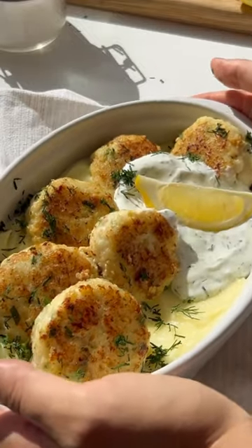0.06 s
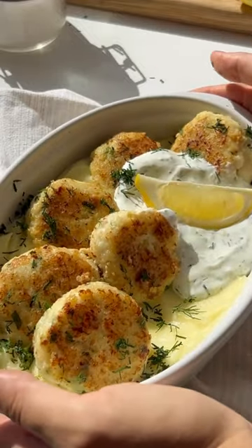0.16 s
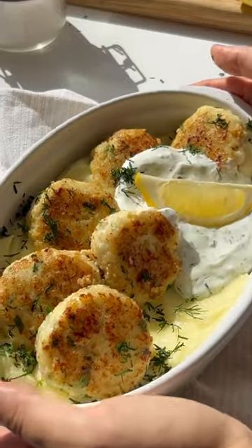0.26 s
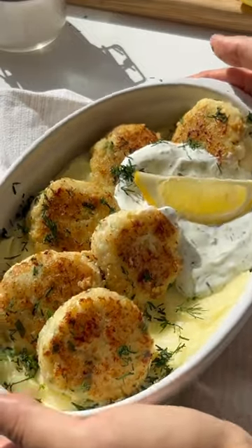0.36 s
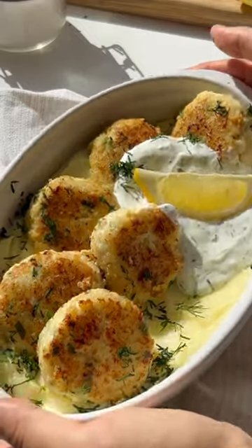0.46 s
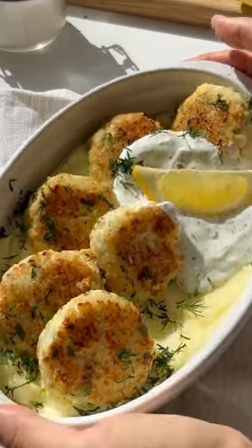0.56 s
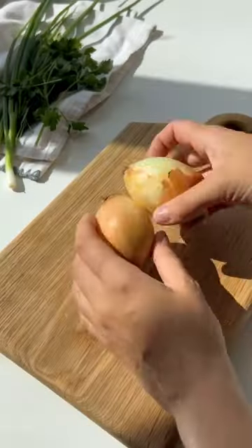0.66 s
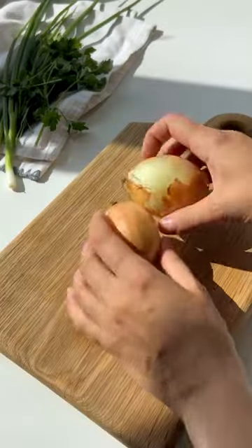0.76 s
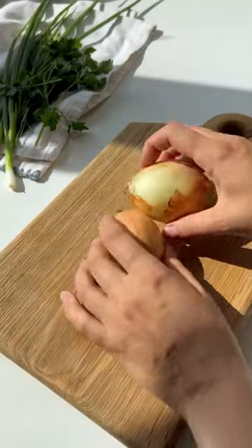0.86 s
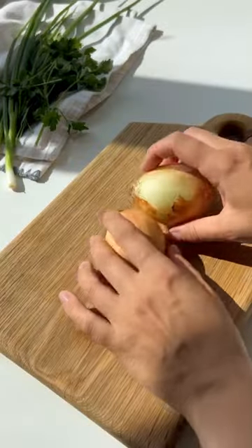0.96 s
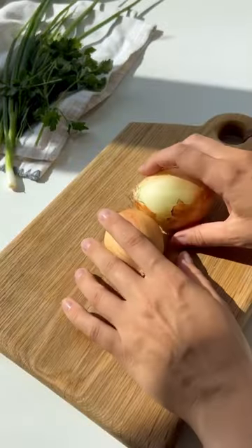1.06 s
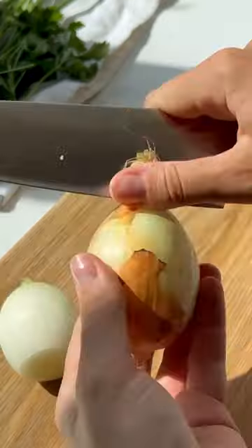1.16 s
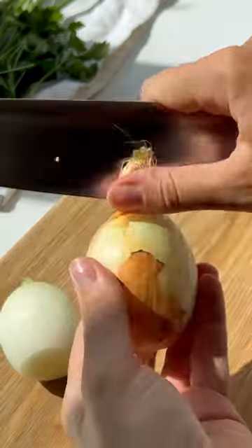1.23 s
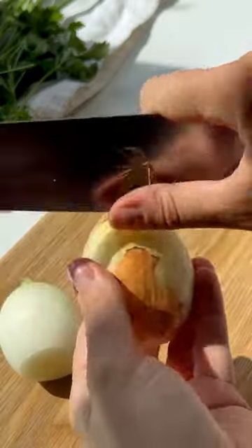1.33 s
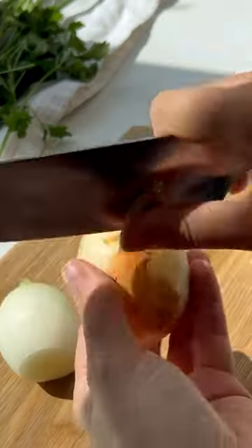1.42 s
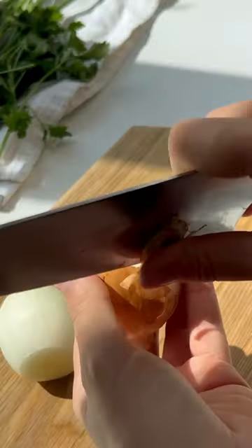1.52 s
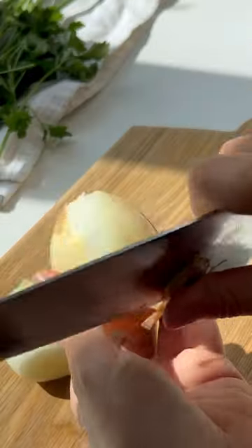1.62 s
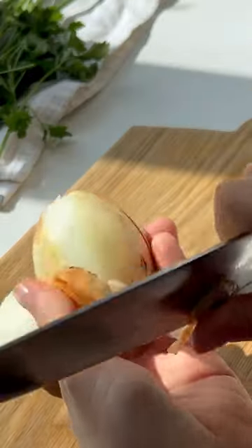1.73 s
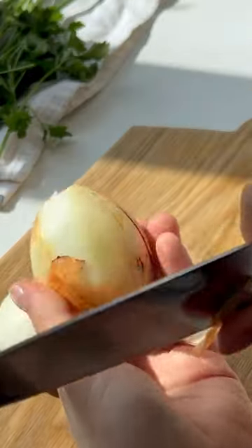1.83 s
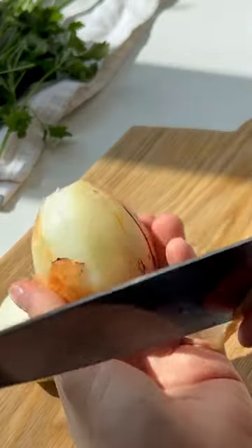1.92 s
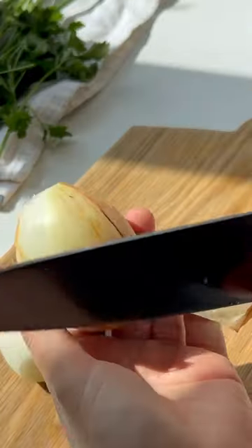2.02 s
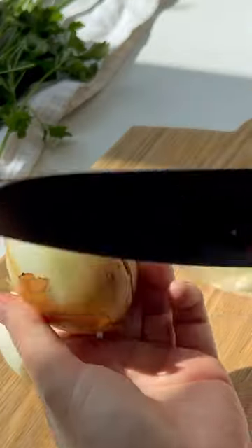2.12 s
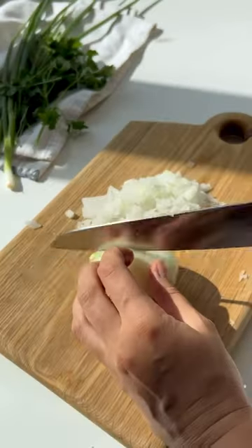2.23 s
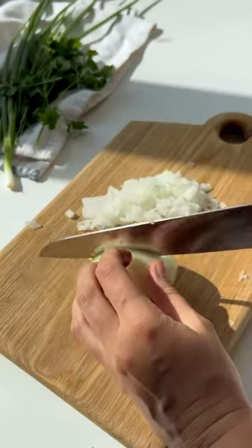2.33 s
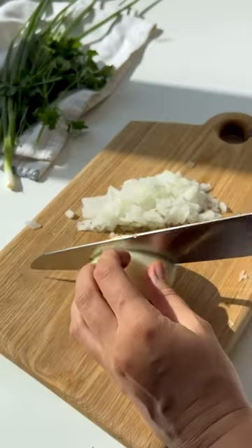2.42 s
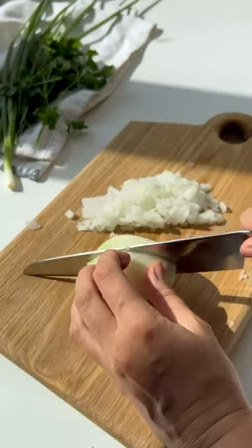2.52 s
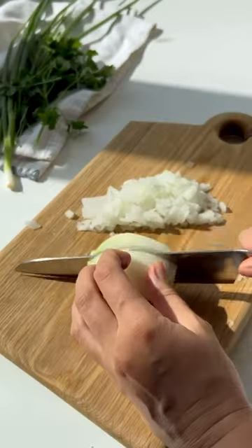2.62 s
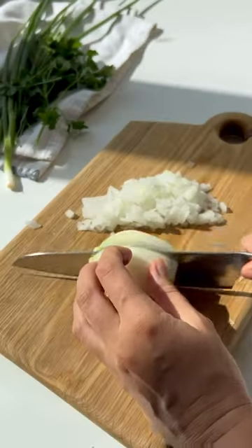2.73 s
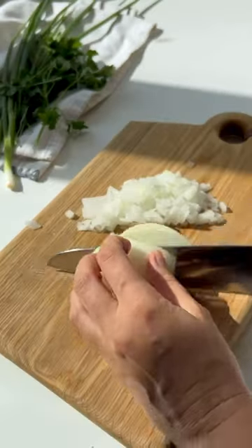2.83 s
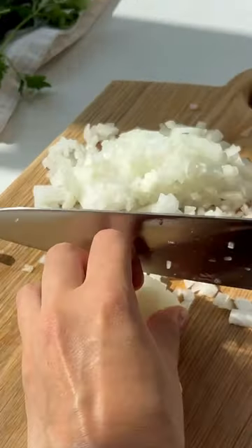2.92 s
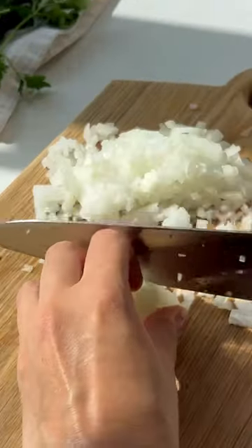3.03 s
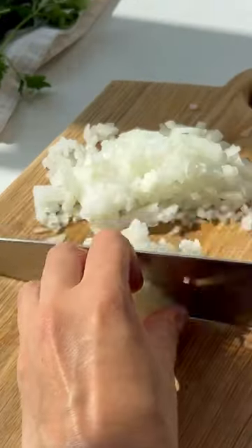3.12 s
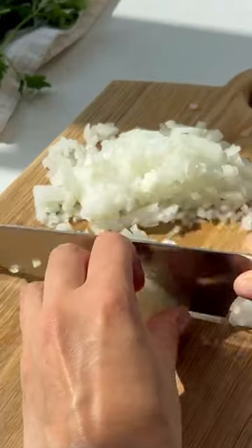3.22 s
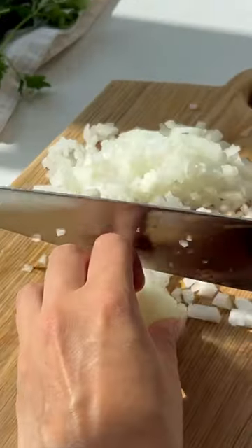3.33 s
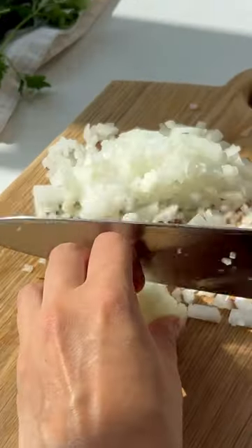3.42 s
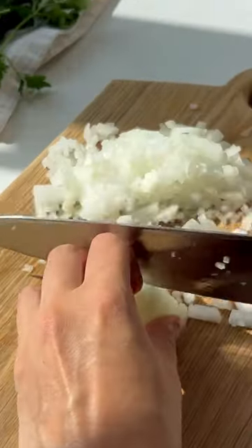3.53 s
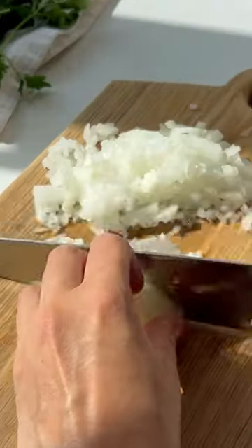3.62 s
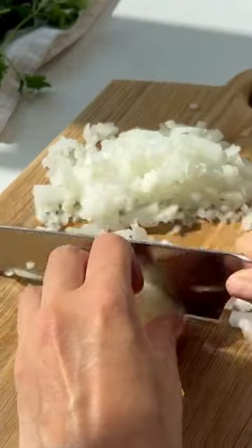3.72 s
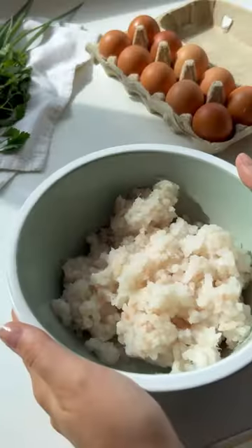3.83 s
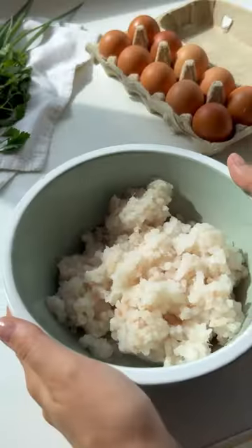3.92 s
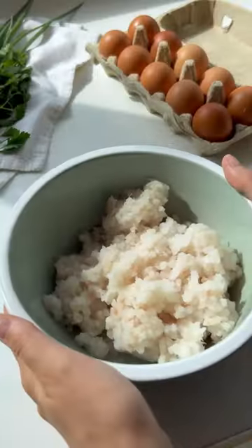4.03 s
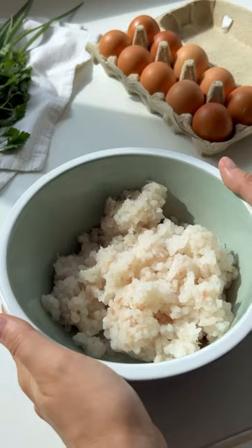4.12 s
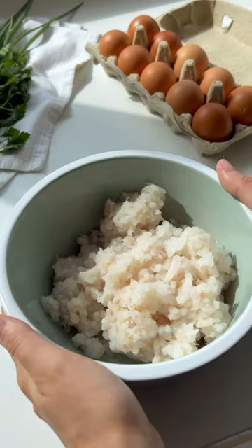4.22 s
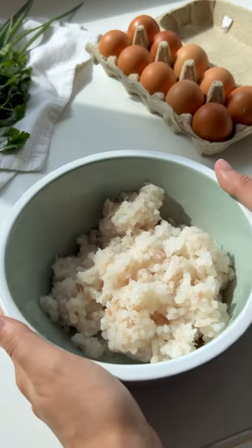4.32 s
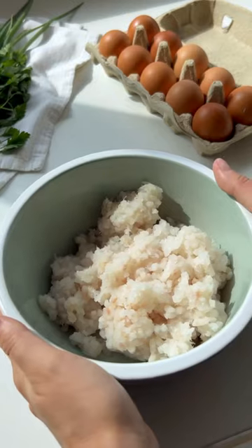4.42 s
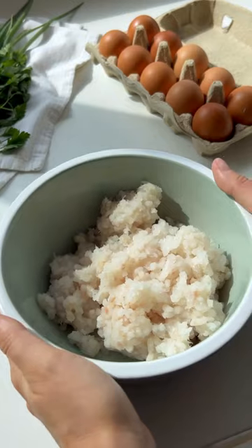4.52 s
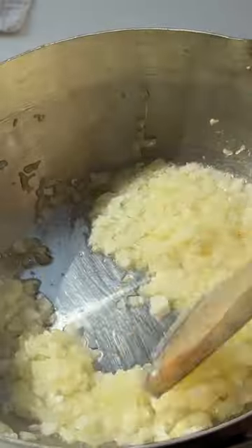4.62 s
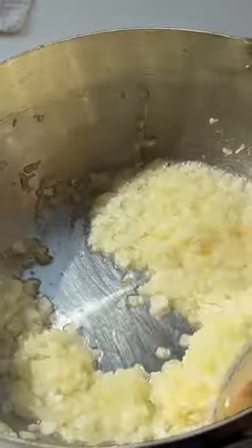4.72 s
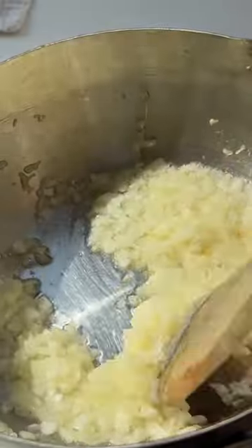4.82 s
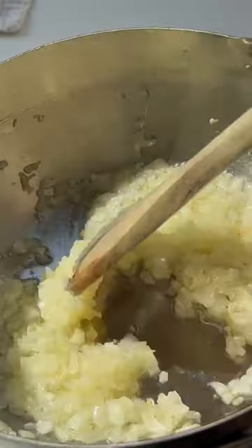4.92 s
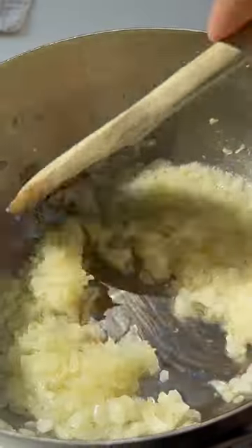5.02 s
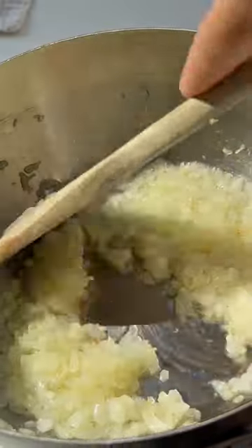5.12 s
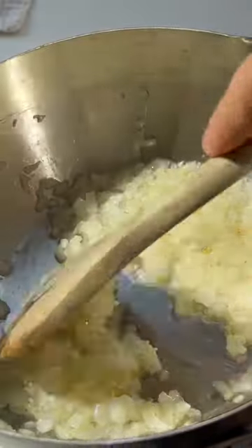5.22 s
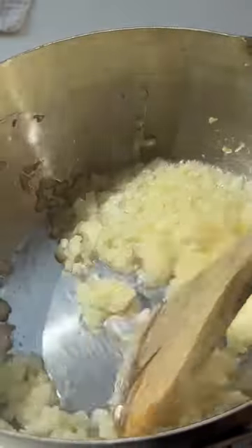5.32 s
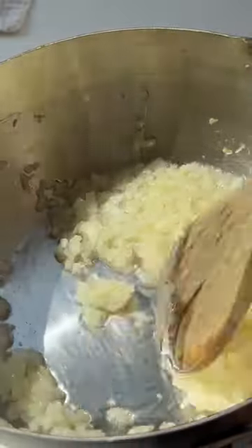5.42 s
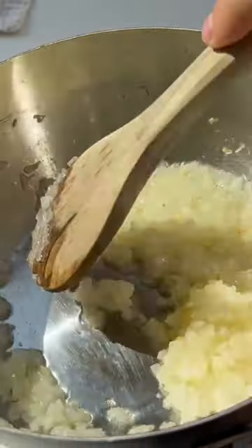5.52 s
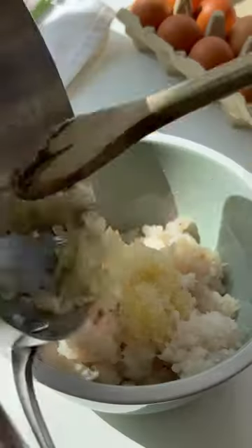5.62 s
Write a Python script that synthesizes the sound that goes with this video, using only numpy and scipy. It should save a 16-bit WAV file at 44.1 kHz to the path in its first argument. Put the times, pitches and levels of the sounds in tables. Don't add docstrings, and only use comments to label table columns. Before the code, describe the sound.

Phone view from above a kitchen worktop, small echoing room, hum and hiss changing at every hard cut. Quiet onion handling leads to bright peeling crackles, wetter slicing crunches with a knife knock, and two hard chops preceded by crisp pressing. Then one hollow bowl thud, a bright metallic pan knock, dry spoon taps, gentle sizzle and a final dull bump.

```python
import sys
import numpy as np
from scipy import signal
from scipy.fft import rfft, irfft, next_fast_len
from scipy.io import wavfile
from scipy.ndimage import uniform_filter1d

SR = 44100
rng = np.random.default_rng(int(sys.argv[2]) if len(sys.argv) > 2 else 0)


def wav_out(sig):
    wavfile.write(sys.argv[1], SR, np.round(np.clip(np.atleast_2d(sig).T, -1, 1) * 32767).astype(np.int16))


def volts(x):
    e = np.asarray(x, float) / 20
    return 10 ** e


N = 249606

# (time [s], blade level [dB], blade contact [ms], board level [dB], clatter level [dB])
CHOPS = [
    (2.964, -53, 0.19, -51.5, -50.5),
    (3.1175, -12, 0.28, -25.5, -6.5),
    (3.446, -65, 0.59, -47.5, -71.5),
    (3.629, -10.5, 0.42, -25.5, -9),
]
# (frequency [Hz], level [dB], t60 [s])
BLADE = [(674, -6, 0.11), (736, -12, 0.067), (920, -3.5, 0.045), (1013, -4.5, 0.036), (1078, 0, 0.012),
         (1193, 3.5, 0.09), (1249, -8.5, 0.058), (1335, -12, 0.1), (1534, -10, 0.12), (1626, -2.5, 0.045),
         (1770, -15, 0.12), (2310, -11.5, 0.086), (2553, -7.5, 0.025), (3160, -18, 0.014)]
# (frequency [Hz], level [dB], t60 [s])
BOARD = [(133.9, -26, 0.29), (165, -7.5, 0.96), (205.3, -10.5, 0.25), (240, -10.5, 0.12), (365, -1, 0.22),
         (568, 5.5, 0.11), (675, -3, 0.16)]
# (frequency [Hz], level [dB])
CHOP_FAR = [(480, -3.5), (650, -4), (900, -6), (1150, 1), (1500, -3.5), (1850, -3), (2200, -11.5),
            (2700, -18.5), (3500, -23), (6000, -44)]


def chopping():
    return blows(CHOPS, BLADE, BOARD, lower_ms=1.76, clatter_ms=2.72, far_db=-4,
                 grip=(1.35, 2.8, -0.21), far=CHOP_FAR)


# (time [s], hold [s], treble level [dB], middle level [dB])
DICE = [
    (2.968, 0.017, -42.5, -42),
    (3.043, 0.072, -31.5, -41.5),
    (3.444, 0.0013, -43, -39),
    (3.518, 0.051, -42, -71),
    (3.556, 0.062, -32.5, -37),
]
# (frequency [Hz], density [dB per Hz])
DICE_TONE = [(240, -42), (400, 15.5), (738, 24), (953, 6), (1210, 10.5), (1420, -6), (1590, 1), (2470, -18),
             (2690, -11.5), (3020, -21), (8770, -23.5), (12000, -31.5), (15600, -56), (22000, -120)]


def dicing():
    return crushing(DICE, (2800, 87, 890), DICE_TONE, split_hz=2530, song_db=2.7)


# (time [s], hold [s], treble level [dB], middle level [dB])
SLICE = [
    (2.21, 0.089, -57.5, -47.5),
    (2.35, 0.0012, -49, -41),
    (2.41, 0.061, -50.5, -45),
    (2.51, 0.11, -60.5, -84),
    (2.59, 0.078, -47, -39.5),
    (2.76, 0.087, -56.5, -82),
    (2.91, 0.026, -51, -55.5),
]
# (frequency [Hz], density [dB per Hz])
SLICE_TONE = [(290, -9), (500, 0), (619, -28), (688, 6), (786, -8), (1190, 5), (1430, -8), (1590, 0),
              (3220, 5.5), (4990, -6), (9450, 0.5), (12000, -8.5), (15600, -42), (22000, -120)]


def slicing():
    return crushing(SLICE, (280, 0, 290), SLICE_TONE, split_hz=5500, song_db=0.97)


def crushing(rows, pace, tone, split_hz, song_db):
    noise = grains(650, 4.6, 1.6, bed=.85)
    song = sum(volts(g) * signal.lfilter(*signal.iirpeak(f, 22., SR), noise) for f, g, _ in BLADE)
    return rubbing(rows, pace, tone, split_hz, noise + volts(song_db) * song)


# (time [s], edge level [dB], edge contact [ms], slab level [dB], clatter level [dB])
LANDING = [
    (2.474, -22, 0.077, -17, -14),
]
# (frequency [Hz], level [dB], t60 [s])
EDGE = [(814, 5, 0.046), (1218, 2.5, 0.087), (1494, -7, 0.017), (1900, -12, .02), (2610, -2, 0.026),
        (5100, -24, 0.011)]
# (frequency [Hz], level [dB], t60 [s])
SLAB = [(181, -8, 0.17), (207, -13, 0.089), (293, -15, 0.086), (314, -2.5, 0.072), (371.5, -0.5, 0.21),
        (399, 0, 0.077), (460, 0, 0.085), (580, -3, 0.052)]


def landing():
    return blows(LANDING, EDGE, SLAB, lower_ms=0.75, clatter_ms=4.0, far_db=-8.5, grip=(1.5, 4.3, -0.034))


# (time [s], blade level [dB], blade contact [ms], onion level [dB], clatter level [dB])
DROPS = [
    (.881, -59, 0.41, -36.5, -61),
    (1.03, -81, 0.3, -38, -54),
]
# (frequency [Hz], level [dB], t60 [s])
ONION = [(72, -50, 0.18), (84.5, 10, 0.062), (136, 12.5, 0.076), (178.5, -0.5, 0.59), (219, 1, 0.042)]


def onion_drops():
    return blows(DROPS, BLADE, ONION, lower_ms=2.1, clatter_ms=4.3)


# (time [s], hold [s], treble level [dB], middle level [dB])
PEEL = [
    (.655, 0.015, -65, -71),
    (.878, 0.0072, -72.5, -66),
    (1.21, 0.0074, -48, -63),
    (1.245, 0.025, -44.5, -61),
    (1.31, 0.1, -48, -68),
    (1.42, 0.15, -57, -61.5),
    (1.58, 0.11, -53, -60.5),
    (1.72, 0.084, -61, -61.5),
    (1.84, 0.06, -59, -62),
    (1.94, 0.042, -66, -58),
]
# (frequency [Hz], density [dB per Hz])
PEEL_TONE = [(350, -45), (600, 5), (715, 0), (991, 6.5), (1070, -3), (1270, 2.5), (1920, 4), (2410, 9.5),
             (4030, -8), (6410, -5), (8450, 3), (11300, -3), (12000, -19.5), (15600, -27), (22000, -120)]


def peeling():
    return rubbing(PEEL, (490, 0, 430), PEEL_TONE, 4200, grains(900, 2.2, 1.0, bed=1.0))


# (time [s], peak level [dB])
FLESH_SNAPS = [(1.0236, -57), (1.1947, -39), (2.2079, -33), (2.2827, -23), (2.3336, -21), (2.3715, -25),
               (2.581, -26), (2.7277, -30), (2.9696, -25), (3.0415, -27), (3.0565, -24), (3.0744, -27),
               (3.4446, -36), (3.5553, -24), (3.5994, -30), (5.4121, -37)]
# (time [s], peak level [dB])
SKIN_SNAPS = [(1.2166, -25), (1.2521, -16), (1.2744, -26), (1.3498, -23.5), (1.3564, -26), (1.3734, -29),
              (1.3844, -31), (1.8447, -39), (1.9415, -34), (1.9701, -31), (1.9874, -34), (2.1256, -51),
              (2.7277, -23), (3.5184, -29)]
# (time [s], peak level [dB])
HOLLOW_SNAPS = [
    (1.2166, -35),
    (1.2521, -34.5),
    (1.357, -38),
    (1.378, -36),
    (1.5738, -33.5),
    (1.724, -42.5),
    (1.9874, -40),
]
# (time [s], peak level [dB])
LOW_SNAPS = [
    (1.2744, -42),
    (1.293, -48),
    (1.439, -55),
    (1.455, -40),
    (1.51, -48),
]
# (time [s], peak level [dB])
CRUNCHES = [
    (2.300, -37),
    (2.378, -25.5),
    (2.403, -28),
    (2.5575, -36),
    (2.602, -32),
    (2.622, -32),
    (2.652, -28),
    (2.695, -30),
    (2.731, -31),
]


def onion_snaps():
    return (snaps(FLESH_SNAPS, 2500, 1.8) + snaps(SKIN_SNAPS, 9400, 2.1) + snaps(HOLLOW_SNAPS, 2450, 4.1)
            + snaps(LOW_SNAPS, 1630, 3.5) + snaps(CRUNCHES, 2860, 1.4))


def snaps(table, centre_hz, sharpness):
    out, t = np.zeros((2, N)), np.arange(400) / SR
    for s, peak_db in table:
        burst = rng.standard_normal((2, 400)) * (np.exp(-t / .0008) + .3 * np.exp(-t / .005))
        burst = signal.lfilter(*signal.iirpeak(centre_hz, sharpness, SR), burst)
        start = int(s * SR)
        out[:, start:start + 400] += volts(peak_db) * burst / np.abs(burst[0]).max()
    return out


# (time [s], level [dB], resonance [Hz])
TEAR = [
    (1.33, -66, 2450),
    (1.38, -57, 2500),
    (1.405, -54, 1800),
    (1.435, -51, 1450),
    (1.465, -53, 1280),
    (1.49, -57, 1250),
    (1.51, -56, 1350),
    (1.56, -63, 1100),
]


def tearing():
    s, _, hz = np.transpose(TEAR)
    phase = 2 * np.pi * np.cumsum(np.interp(np.arange(N) / SR, s, hz)) / SR
    out = 0
    for ratio, db in ((1, 0), (1.5, -7)):
        width_hz = 160 * ratio
        slow = signal.lfilter(*signal.butter(2, width_hz, fs=SR), grains(340, 4.6, 5.7, bed=1.0))
        strand = slow[0] * np.cos(ratio * phase) + slow[1] * np.sin(ratio * phase)
        out = out + volts(db) * strand / slow.std()
    return curve(TEAR) * out


def curve(rows):
    t = np.arange(N) / SR
    s, db = np.transpose(rows)[:2]
    gain = volts(np.interp(t, s, db)) * (t >= s[0]) * (t <= s[-1])
    return uniform_filter1d(gain, 200)


# (time [s], bowl level [dB], bowl contact [ms], stove level [dB], clatter level [dB])
SETDOWN = [
    (4.244, -54, .8, -63, -31),
    (4.252, -14.5, 0.66, -64, -20),
]
# (frequency [Hz], level [dB], t60 [s])
BOWL = [(170, -7.5, 0.13), (232, -7, 0.16), (272, 0.5, 0.16), (314, -9.5, 0.049), (377, 1.5, 0.098),
        (485, -4, 0.044), (687, -3, 0.039), (770, -17, 0.019), (1240, -13.5, 0.03), (1480, -19.5, .02),
        (2200, -20, .02), (2710, -20.5, .02), (3220, -35, .01), (6800, -52, .01)]
# (frequency [Hz], level [dB], t60 [s])
STOVE = [(73.5, -15, 0.5), (170, -31.5, 0.28), (237.6, 4, 0.41), (319, -5, 0.45), (377, -2, 0.087),
         (518, 5.5, 0.072), (780, 14, 0.029), (950, -34, 0.046)]
# (frequency [Hz], level [dB])
BOWL_FAR = [(170, -4.5), (260, -1), (400, -0.5), (650, -11.5), (1000, -17.5), (1900, -28.5), (2800, -30),
            (3300, -40.5), (6800, -62)]


def bowl_setdown():
    return blows(SETDOWN, BOWL, STOVE, lower_ms=5.3, clatter_ms=8.5, far_db=2.0,
                 grip=(1.7, 8.5, -4), far=BOWL_FAR)


# (time [s], pan level [dB], pan contact [ms], stove level [dB], clatter level [dB])
KNOCKS = [
    (4.6943, -15.5, 0.22, -44, -30),
    (4.70, -41, 0.31, -76, -33),
]
# (frequency [Hz], level [dB], t60 [s])
PAN = [(534, -15, 0.21), (774, -6, 0.092), (1044, -17.5, 0.28), (1570, 3, 0.039), (1575, -9.5, 0.33),
       (1830, -6.5, .06), (2090, -7.5, 0.021), (2212, -13.5, 0.56), (2510, -10, .06), (2700, -1.5, 0.022),
       (2902, -13.5, .6), (3400, -18, 0.13), (4450, -15.5, 0.23), (5450, -13.5, 0.067)]
# (time [s], pan level [dB], contact [ms], stove level [dB], clatter level [dB])
TWIN_KNOCK = [
    (4.6953, -33, 0.17, -88, -57),
]
# (frequency [Hz], level [dB], t60 [s])
PAN_TWINS = [(558, -1, .15), (714, -5, .2), (1070, -6, 0.26), (1280, -23, 0.074), (1584, -2.5, 0.23),
             (1950, -11, .08), (2170, -10, 0.4), (2400, -16, .07), (2920, -10, .3)]


def pan_knocks():
    mute_s, mute_ms = 4.8, 49
    still = np.exp(-np.clip(np.arange(N) / SR - mute_s, 0, 1) * 1000 / mute_ms)
    grip = (1.6, 7.2, -6)
    main = blows(KNOCKS, PAN, STOVE, lower_ms=0.29, clatter_ms=9.5, far_db=-2.5, grip=grip)
    twins = blows(TWIN_KNOCK, PAN_TWINS, STOVE, lower_ms=0.3, clatter_ms=5.0, far_db=-2.5, grip=grip)
    return still * (main + twins)


# (time [s], wood level [dB], wood contact [ms], stove level [dB], clatter level [dB])
SPOON = [
    (4.806, -27.5, .3, -41, -30),
    (4.86, -56, .5, -50, -52),
]
# (frequency [Hz], level [dB], t60 [s])
WOOD = [(332, -27, 0.04), (541, -5.5, 0.057), (816, 4.5, 0.019), (1000, -3.5, 0.018), (1520, -11.5, 0.026),
        (2000, -11, 0.04), (3000, -34, .01)]


def spoon_taps():
    return blows(SPOON, WOOD, STOVE, lower_ms=1.8, clatter_ms=3.2)


# (time [s], spoon level [dB], spoon contact [ms], floor level [dB], clatter level [dB])
BUMP = [
    (5.128, -33, 0.92, -28, -42),
]
# (frequency [Hz], level [dB], t60 [s])
BUMP_EDGE = [(330, -6, 0.026), (594, 1, 0.04), (730, -7, .025), (865, 2, .04), (1290, -15, .015)]
# (frequency [Hz], level [dB], t60 [s])
PAN_FLOOR = [(73, -12, 0.14), (171, -0.5, 0.22), (225.3, 0.5, 0.22), (252.5, -2.5, 0.15), (321, 0, 0.087),
             (384, -4, 0.16), (538, -2.5, .08)]


def spoon_bump():
    return blows(BUMP, BUMP_EDGE, PAN_FLOOR, lower_ms=1.55, clatter_ms=4.0, far_db=-1.5, grip=(3.0, 50, 0))


# (time [s], hold [s], treble level [dB], middle level [dB])
SIZZLE = [
    (4.6, 0.93, -55, -54.5),
]
# (frequency [Hz], density [dB per Hz])
SIZZLE_TONE = [(290, -15), (500, -1.5), (726, -7), (786, -9), (874, 2), (1190, -9.5), (2500, 3), (3480, -4),
               (11100, -4.5), (12000, -17), (15600, -40), (22000, -120)]


def sizzling():
    return rubbing(SIZZLE, (450, 0, 110), SIZZLE_TONE, 8000, grains(1500, 7.0, 1.0, bed=1.7))


# (time [s], upper level [dB], upper contact [ms], lower level [dB], clatter level [dB])
THUMP = [
    (4.79, -38.5, 6.0, -80, -81),
]
# (frequency [Hz], level [dB], t60 [s])
STAND = [(67, -5, .25), (82, 2, 0.23)]


def stand_thump():
    return blows(THUMP, STAND, STAND, lower_ms=6.0, clatter_ms=4.0, far_db=-1, grip=(25, 50, 0))


def blows(table, upper, lower, lower_ms, clatter_ms, far_db=0, grip=(.3, 50, 0), far=None):
    out, ms = np.zeros((2, N + SR)), np.arange(SR * 3 // 5) * 1000 / SR
    spread_ms, free_ms, damped_db = grip
    shape = np.clip(ms / spread_ms, 0, 1) ** 2 * volts(damped_db * np.clip(ms - free_ms, 0, 1))
    for s, upper_db, upper_ms, lower_db, clatter_db in table:
        thin = ring(upper_db, upper_ms, upper) * volts([[0], [far_db]])
        low = ring(lower_db, lower_ms, lower)
        y = low + shape * (thin + clatter(clatter_db, upper, clatter_ms))
        if far:
            y[1] = low + clatter(clatter_db + far_db, far, clatter_ms)
        start = int(s * SR)
        out[:, start:start + y.shape[1]] += y
    return out[:, :N]


def ring(db, contact_ms, modes):
    t = np.arange(SR * 3 // 5) / SR
    y = np.zeros(len(t))
    for k, (hz, mode_db, t60) in enumerate(modes):
        luck_db, detune = rng.standard_normal(2)
        decay = np.exp(-np.log(1000) * t / max(t60, .01))
        tone = np.sin(2 * np.pi * hz * (1 + 0.002 * detune) * t)
        y += (-1) ** k * volts(mode_db + luck_db) * decay * tone
    push = np.sin(np.pi * np.clip(t[:400] * 1000 / max(contact_ms, .05), 0, 1))
    return volts(db) * np.convolve(y, push / push.sum())[:len(t)]


def clatter(db, modes, ms):
    size = 2048
    t = np.arange(size) / SR
    tone = [(modes[0][0] / 2, -30)] + [mode[:2] for mode in modes] + [(modes[-1][0] * 2, -60)]
    fold = irfft(on_log(np.arange(size // 2 + 1) * SR / size, tone) * np.log(10) / 20)
    fold[1:size // 2], fold[size // 2:] = 2 * fold[1:size // 2], 0
    click = irfft(np.exp(rfft(fold)))
    click = click / np.abs(click).max()
    contacts = even(rng.standard_normal(size) * np.exp(-t * 1000 / ms), 40, 8000) * np.exp(-t * 300 / ms)
    rattle = volts(-16.0) * np.convolve(contacts, click)[:size]
    return volts(db + 5.0) * np.pad(click + rattle, (0, SR * 3 // 5 - size))


def rubbing(rows, pace, tone, split_hz, noise):
    treble = swells(rows, 2, *pace) * colour(noise, tone, lo_hz=split_hz)
    middle = swells(rows, 3, *pace) * colour(noise, tone, hi_hz=split_hz)
    return treble + middle


def grains(rate_hz, spread_db, ms, bed):
    sizes_db = spread_db * np.minimum(rng.exponential(size=N), 2)
    kicks = (rng.random(N) < rate_hz / SR) * volts(sizes_db)
    glow = signal.lfilter([1], [1, -np.exp(-1000 / (ms * SR))], kicks)
    return (bed + glow / np.sqrt(np.mean(glow ** 2))) * rng.standard_normal((2, N))


def swells(rows, column, rise_db_s, growth_db_s, fall_db_s):
    t, gain = np.arange(N) / SR, np.zeros(N)
    cuts = [view[0] for view in VIEWS] + [N / SR]
    for row in rows:
        k, end = np.searchsorted(cuts, row[0]), row[0] + row[1]
        a, b = int(cuts[k - 1] * SR), int(cuts[k] * SR)
        now = t[a:b]
        lost_db = rise_db_s * np.maximum(row[0] - now, 0) + growth_db_s * np.maximum(end - now, 0)
        lost_db += fall_db_s * np.maximum(now - end, 0)
        gain[a:b] += volts(row[column] - lost_db)
    return gain


def on_log(hz, points):
    f, v = np.transpose(points)
    return np.interp(np.log(np.maximum(hz, 1)), np.log(f), v)


def colour(x, points, lo_hz=0, hi_hz=30000):
    size = next_fast_len(x.shape[-1])
    hz = np.arange(size // 2 + 1) * SR / size
    edges = np.sqrt((1 + (lo_hz / (hz + 1)) ** 8) * (1 + (hz / hi_hz) ** 8))
    y = irfft(rfft(x, size) * volts(on_log(hz, points)) / edges, size)[..., :x.shape[-1]]
    return y / np.sqrt(np.mean(y ** 2))


def even(x, fine_hz, broad_hz):
    spectrum = rfft(x)
    power = np.abs(spectrum) ** 2
    fine, broad = (uniform_filter1d(power, int(hz * x.shape[-1] / SR) + 1) for hz in (fine_hz, broad_hz))
    return irfft(spectrum * np.sqrt(broad / fine), x.shape[-1])


# (frequency [Hz], t60 [s])
ROOM_T60 = [(100, 0.76), (400, 0.43), (1200, 0.62), (3000, 0.48), (8000, 0.37), (11500, 0.22)]
# (frequency [Hz], level [dB])
ROOM_TONE = [(250, 0.5), (450, 0.5), (700, -1), (1200, -0.5), (1500, -0.5), (1850, -4), (2150, -1),
             (3000, -4), (6000, -0.5)]
# (frequency [Hz], side minus mid [dB])
ROOM_WIDTH = [(100, -32.5), (250, -17), (400, -18.5), (650, 0.5), (1200, -2.5), (2200, -12), (5000, -10.5)]


def room():
    lean_hz, dip_db, wall_ms, wall_db = 1145, -6, 14.4, -4.5
    size = SR * 3 // 4
    f, t, z = signal.stft(rng.standard_normal((2, size)), SR, nperseg=256)
    z = z * np.exp(-np.log(1000) * t / on_log(f, ROOM_T60)[:, None])
    z[0] *= volts(dip_db * np.exp(-(np.log((f + 1) / lean_hz) / .16) ** 2))[:, None]
    z *= volts(on_log(f, ROOM_TONE))[:, None]
    z[1] *= volts(on_log(f, ROOM_WIDTH))[:, None]
    echo = even(signal.istft(z, SR, nperseg=256)[1][:, :size], 50, 250)
    echo = echo * np.clip((np.arange(size) / SR - .003) / 0.0016, 0, 1)
    echo = echo / np.sqrt(np.sum(echo[0] ** 2))
    echo[0, int(wall_ms * SR / 1000):][:8] += volts(wall_db) * np.hanning(8) / 3.5
    return echo


def widen(x, treble_db):
    size = next_fast_len(x.shape[-1])
    hz = np.arange(size // 2 + 1) * SR / size
    width = ROOM_WIDTH[:2] + [(500, treble_db / 2), (1200, treble_db / 2 - 2.5), (2200, treble_db - 16.0),
                              (5000, treble_db + 1.5), (7000, -8.5), (11500, -5.5)]
    side = irfft(rfft(x[1], size) * volts(on_log(hz, width)), size)
    return np.array([x[0], side[:x.shape[-1]]])


def ports(mid):
    lean_hz, lean_db, lead_hz, lead_rad = 1145, -3, 6310, 1.15
    hz = np.arange(N // 2 + 1) * SR / N + 1
    lean = np.tanh(lean_db / 17.4) * np.exp(-(np.log(hz / lean_hz) / .45) ** 2)
    lead = np.tan(lead_rad / 2) / (1 + (lead_hz / hz) ** 10)
    return irfft(rfft(mid) * (lean - 1j * lead), N)


# (time [s], hold [s], boom level [dB], drone level [dB], deep level [dB])
LOADS = [(.19, 0.036, -61, -77, -91), (1.04, 0.0056, -78, -83, -41.5), (1.29, 0.5, -50, -58.5, -100),
         (2.24, 0.025, -47.5, -52, -51), (2.35, 0.046, -42.5, -43, -48), (2.49, 0.017, -38.5, -34, -46.5),
         (2.64, 0.22, -53.5, -51.5, -55), (2.95, 0.03, -43.5, -71, -44.5), (3.08, 0.083, -40, -35, -42.5),
         (3.45, 0.0055, -53.5, -83, -41.5), (3.575, 0.11, -38, -36.5, -38.5), (3.82, 0.29, -75, -67, -63),
         (4.26, 0.037, -57, -58, -47.5), (4.72, 0.11, -54, -39, -60), (5.165, 0.028, -56, -47, -74)]
# (time [s], level [dB])
WHINE = [
    (.61, -78),
    (.8, -73.5),
    (1.18, -66.5),
]
# (frequency [Hz], sharpness [Q], level [dB])
WHINE_LINES = [(1830, 6.2, -9.5), (2570, 51, -6)]


def worktop():
    noise = rng.standard_normal((4, N))
    boom = signal.lfilter(*signal.iirpeak(133, 12., SR), noise[0])
    motor = 3.4 * np.sin(2 * np.pi * 132.0 * np.arange(N) / SR)
    boom = boom / boom.std() + motor
    drone = signal.lfilter(*signal.iirpeak(215, 1.5, SR), noise[1])
    drone = signal.lfilter(*signal.iirpeak(215, 3.5, SR), drone)
    deep = colour(noise[2], [(15, -38.5), (30, -10.0), (45, -6.5), (75, -11.0), (110, -9.5), (300, -59.5)])
    whine = sum(volts(g) * signal.lfilter(*signal.iirpeak(hz, q, SR), noise[3]) for hz, q, g in WHINE_LINES)
    loaded = 0
    for column, y in enumerate((boom, drone, deep), 2):
        loaded = loaded + swells(LOADS, column, 336, 0, 147.5) * y / y.std()
    traffic = volts(-66) * deep
    return loaded + traffic + curve(WHINE) * whine / whine.std()


# (frequency [Hz], density [dB per Hz])
HUM = [(13, -41.5), (22, -34.5), (37, -24.5), (130, 1.5), (148, -4.5), (167, -29.5), (184, 4), (233, 1.5),
       (354, -11.5), (478, -9), (529, -14), (604, -15.5), (668, -19.5), (1200, -27), (1560, -62.5),
       (2640, -120)]


def room_hum():
    return colour(rng.standard_normal((2, N)), HUM)


# (frequency [Hz], density [dB per Hz])
HISS = [(410, -46), (700, -1), (877, -13), (965, -6), (1950, -7.5), (2300, -10.5), (7730, -16),
        (12000, -36.5), (15600, -52), (22000, -120)]


def room_hiss():
    duck_db, in_s, out_s = -7.5, .05, .6
    since = np.maximum(np.arange(N) / SR - np.array([[CHOPS[1][0]], [CHOPS[3][0]]]), 0)
    dip = np.max((1 - np.exp(-since / in_s)) * np.exp(-since / out_s), axis=0)
    return colour(rng.standard_normal((2, N)), HISS) * volts(duck_db * dip)


# (time [s], hum level [dB], hiss level [dB], treble side minus mid [dB], echo level [dB])
VIEWS = [
    (0, -76.5, -85, 0, -8),
    (0.604, -50.5, -74, 4, -5),
    (1.187, -55, -77, 0, -3),
    (2.205, -51.5, -54.5, -3, -6),
    (2.936, -52.5, -64.5, -21, -3.5),
    (3.443, -54.5, -61, -18, -2.5),
    (3.783, -53.5, -65, 5, -5),
    (4.572, -55, -57, -6, -6),
    (5.569, -50.5, -69, 3, 8),
]
ECHO_FALL_DB_S = [0, 2, 24, -2.5, -2.5, -1.5, 7, 16, 0]


def scene():
    hits = chopping() + landing() + onion_drops() + bowl_setdown()
    hits = hits + pan_knocks() + spoon_taps() + spoon_bump() + stand_thump()
    rubs = dicing() + slicing() + peeling() + onion_snaps() + sizzling()
    centre = (hits[0] + tearing() + worktop()) * np.array([[1], [0]])
    echo, hum, hiss = room(), room_hum(), room_hiss()
    age_s = np.arange(echo.shape[1]) / SR
    edges = [int(view[0] * SR) for view in VIEWS] + [N]
    out, cut_s, rub_room_db = np.zeros((2, N)), 0.0058, -10
    for view, fall_db_s, a, b in zip(VIEWS, ECHO_FALL_DB_S, edges, edges[1:]):
        _, hum_db, hiss_db, width_db, echo_db = view
        sent = volts(echo_db) * hits[1, a:b] + volts(rub_room_db) * rubs[0, a:b]
        wet = signal.fftconvolve(sent[None], echo * volts(-fall_db_s * age_s), axes=1)[:, :b - a]
        tone = volts(hum_db) * hum[:, a:b] + volts(hiss_db) * hiss[:, a:b]
        spread = widen(rubs[:, a:b] + tone, width_db)
        n = np.arange(b - a)
        fade = np.clip(np.minimum(n, n[::-1]) / (cut_s * SR), 0, 1)
        out[:, a:b] = (wet + spread + centre[:, a:b]) * fade
    side = out[1] + ports(out[0])
    return np.array([out[0] + side, out[0] - side])


def low_pass(x):
    return signal.sosfilt(signal.butter(12, 12380, fs=SR, output="sos"), x)


def record(dry):
    low_hz, top_hz = 37, 11850
    body = signal.sosfilt(signal.butter(3, low_hz, "high", fs=SR, output="sos"), dry)
    mix = signal.sosfilt(signal.ellip(8, .2, 70, top_hz, fs=SR, output="sos"), body)
    return low_pass(mix)


dry = scene()
out = record(dry)
wav_out(out)
```